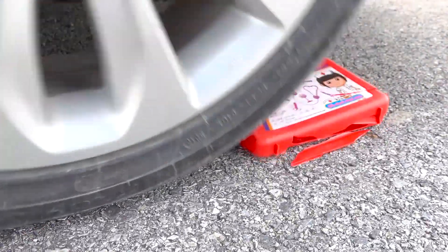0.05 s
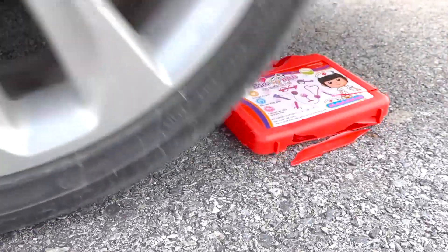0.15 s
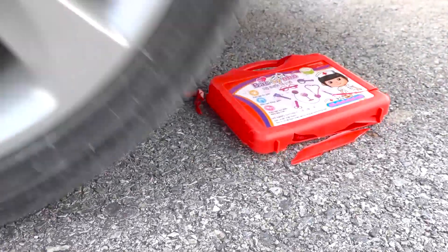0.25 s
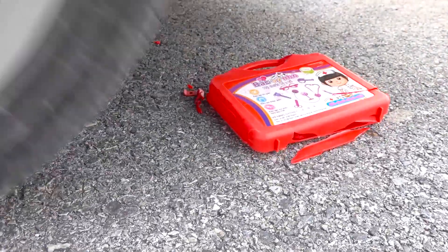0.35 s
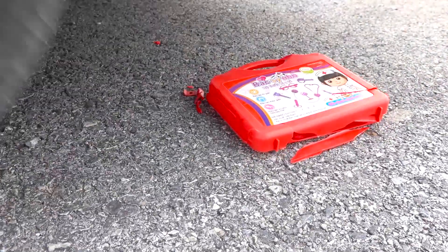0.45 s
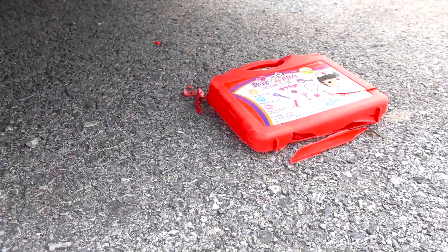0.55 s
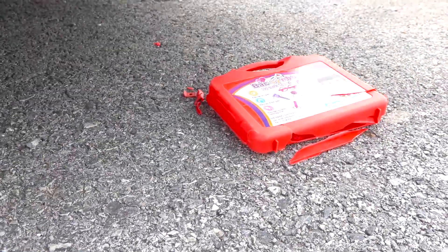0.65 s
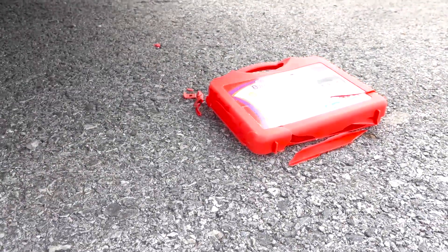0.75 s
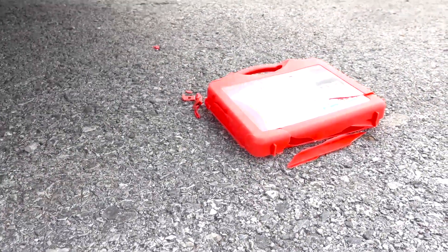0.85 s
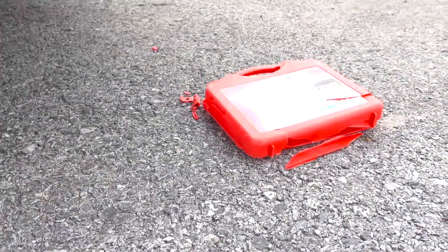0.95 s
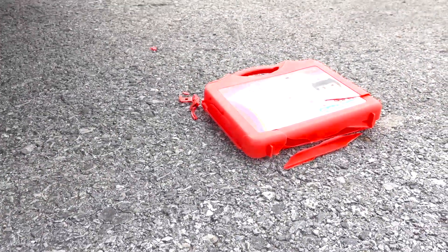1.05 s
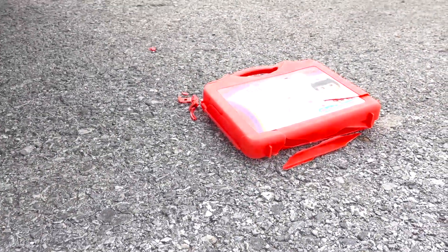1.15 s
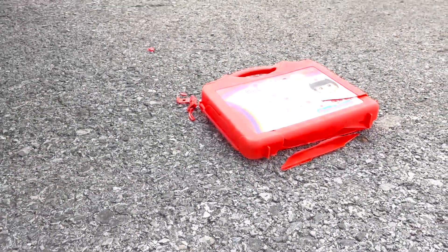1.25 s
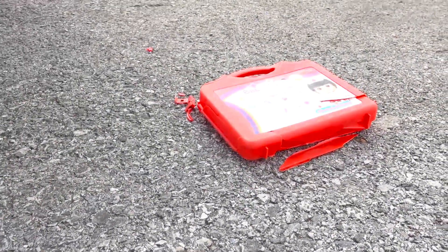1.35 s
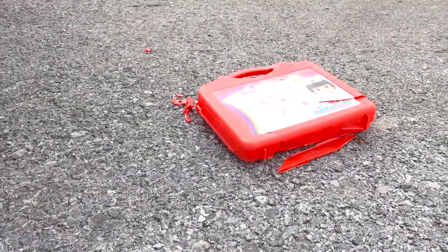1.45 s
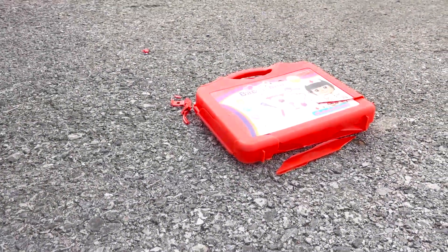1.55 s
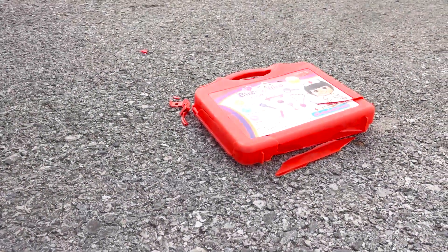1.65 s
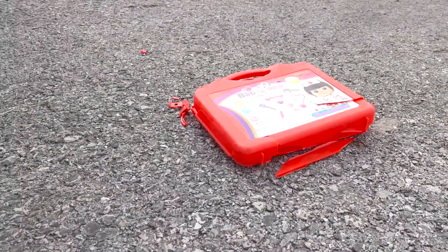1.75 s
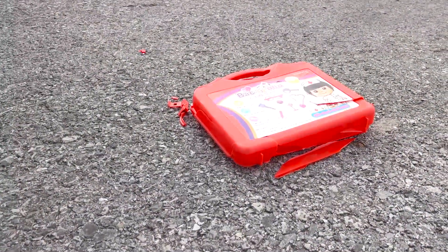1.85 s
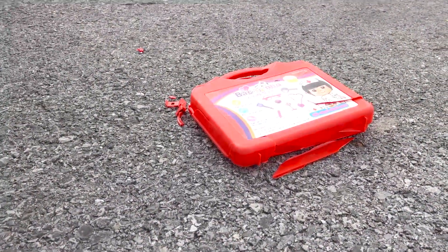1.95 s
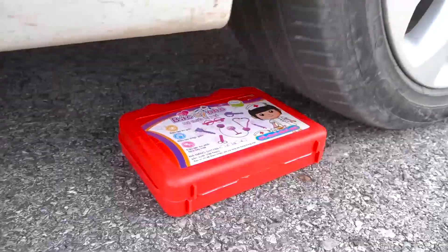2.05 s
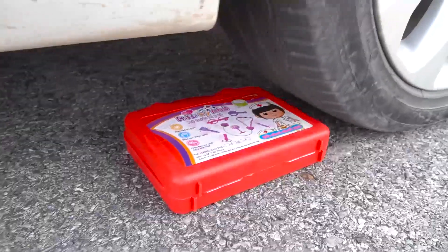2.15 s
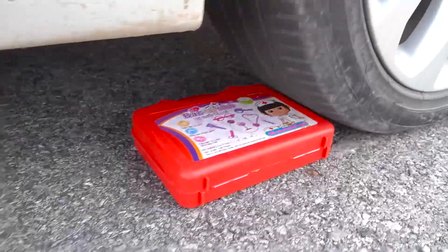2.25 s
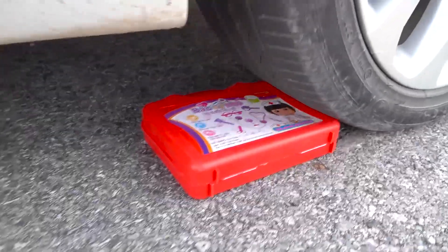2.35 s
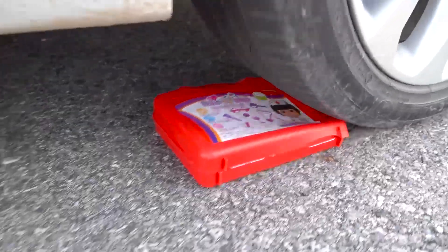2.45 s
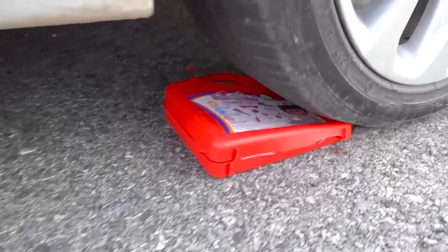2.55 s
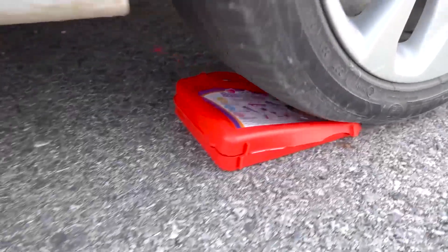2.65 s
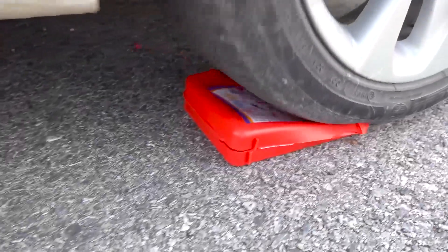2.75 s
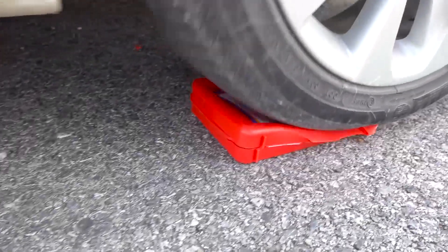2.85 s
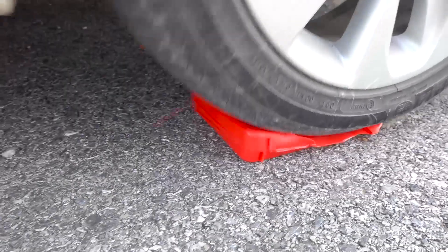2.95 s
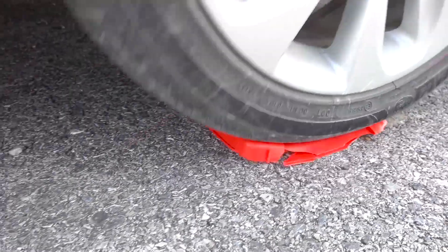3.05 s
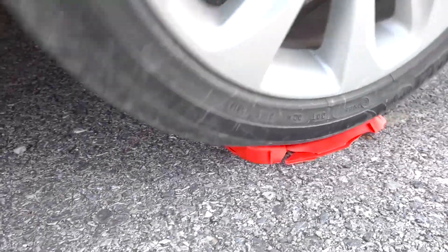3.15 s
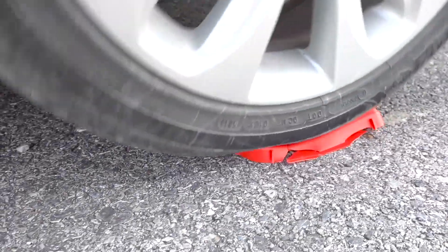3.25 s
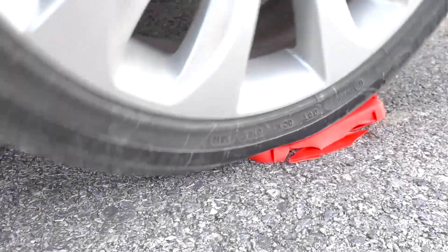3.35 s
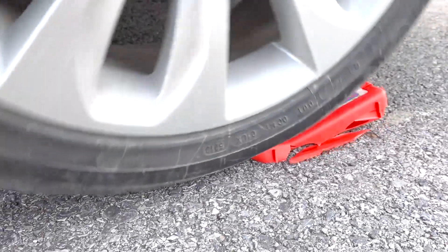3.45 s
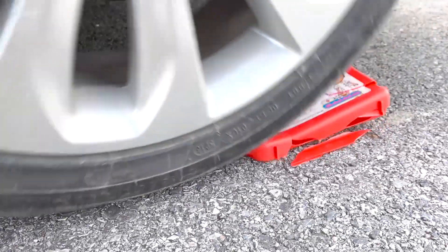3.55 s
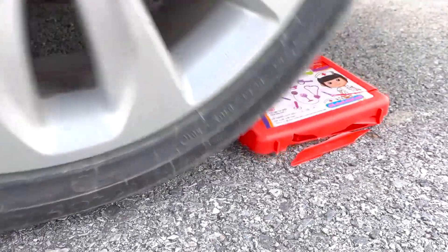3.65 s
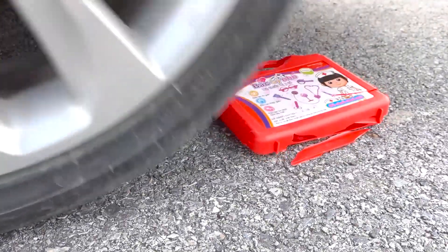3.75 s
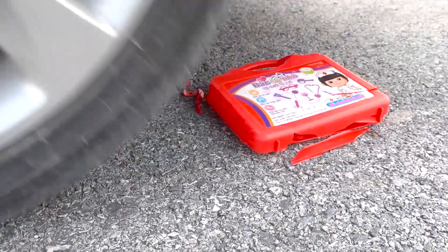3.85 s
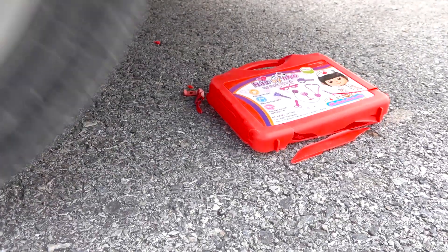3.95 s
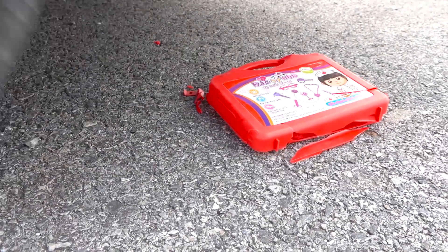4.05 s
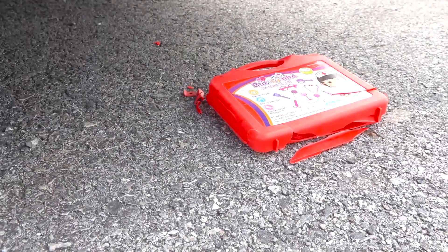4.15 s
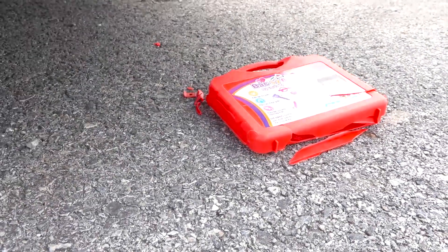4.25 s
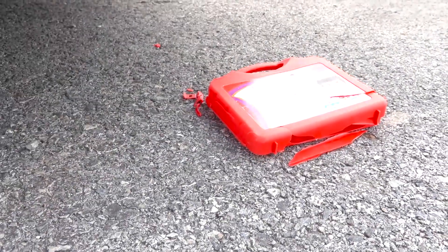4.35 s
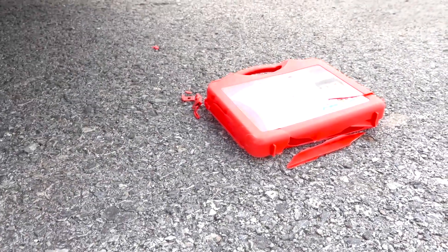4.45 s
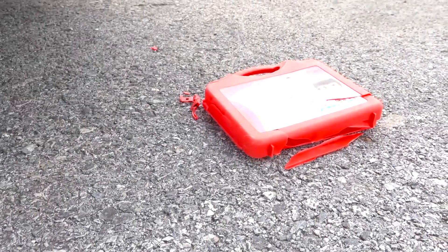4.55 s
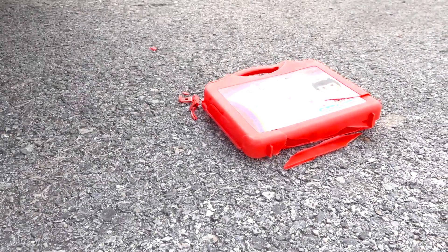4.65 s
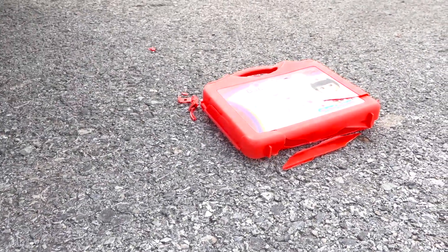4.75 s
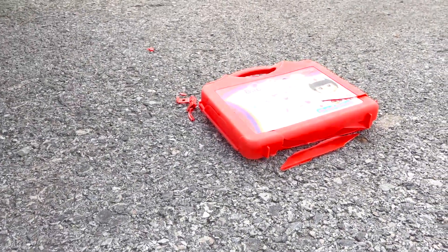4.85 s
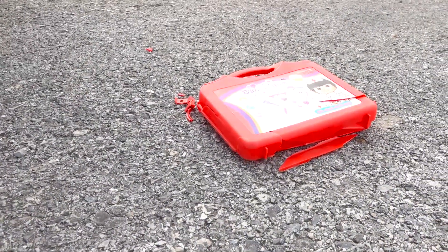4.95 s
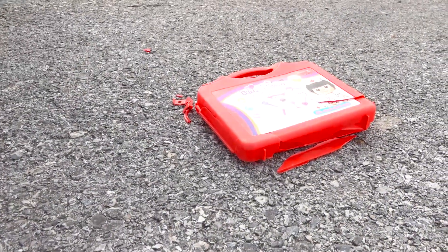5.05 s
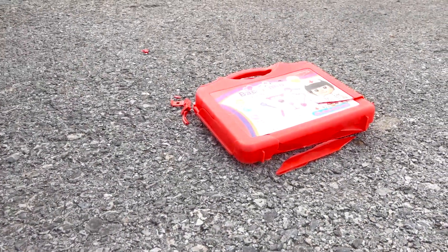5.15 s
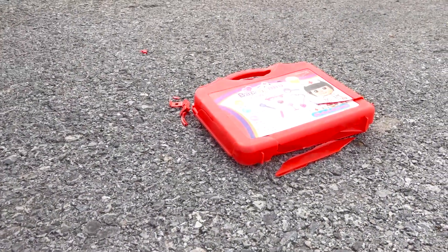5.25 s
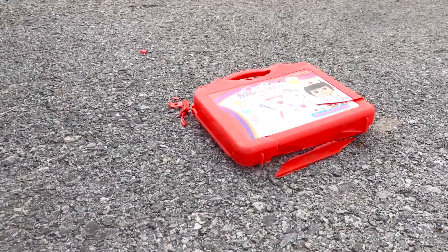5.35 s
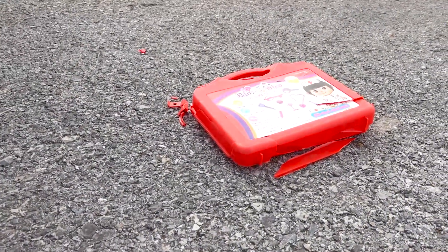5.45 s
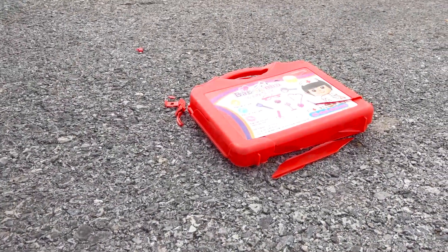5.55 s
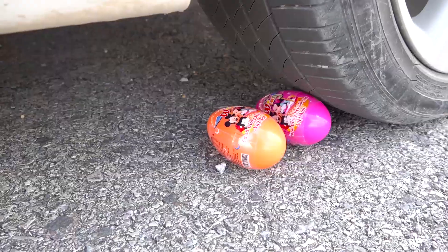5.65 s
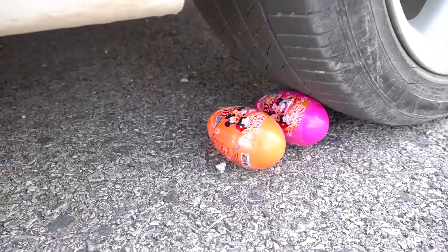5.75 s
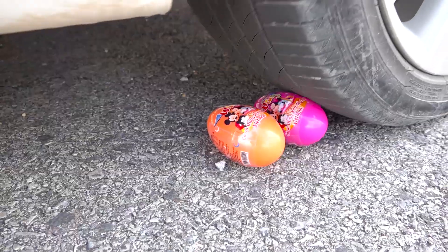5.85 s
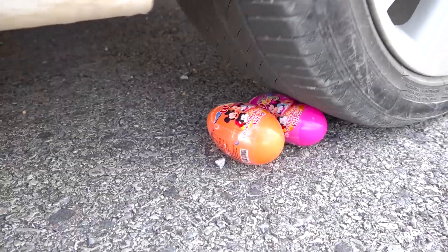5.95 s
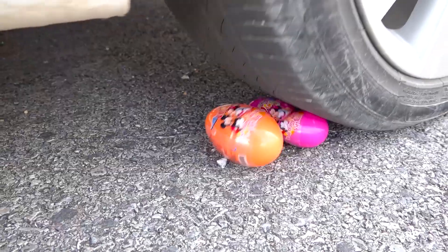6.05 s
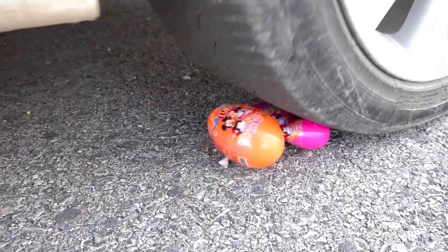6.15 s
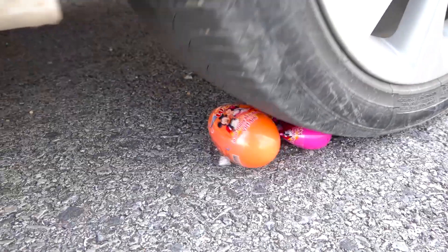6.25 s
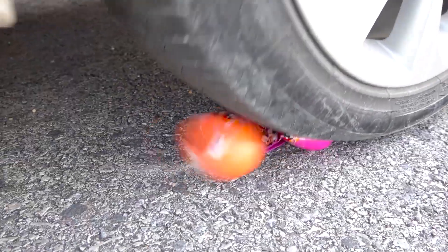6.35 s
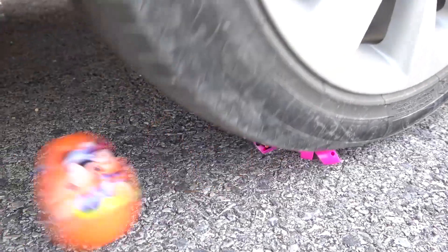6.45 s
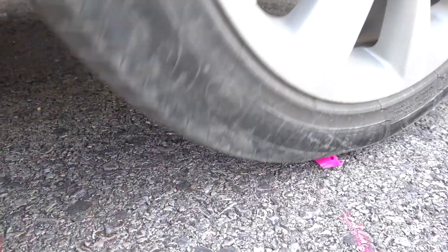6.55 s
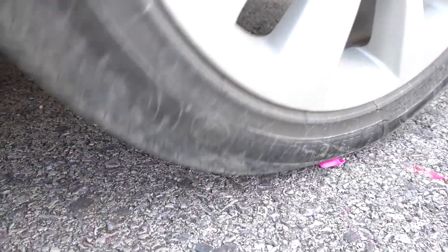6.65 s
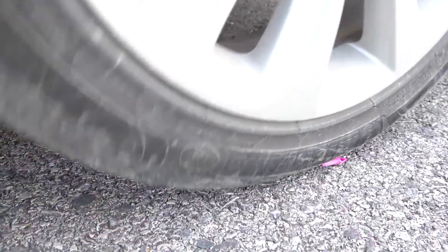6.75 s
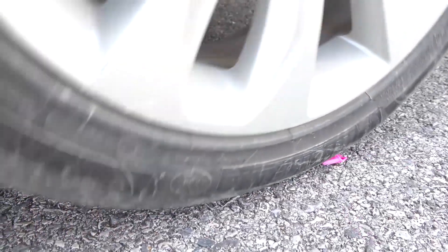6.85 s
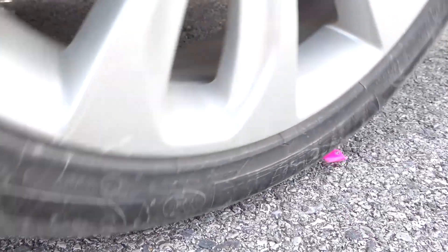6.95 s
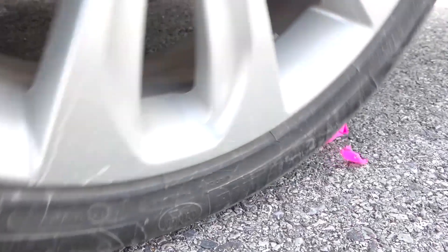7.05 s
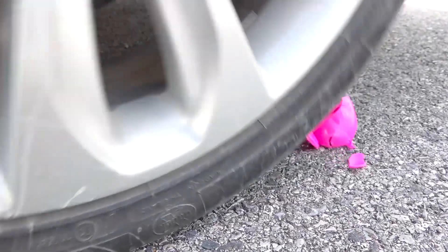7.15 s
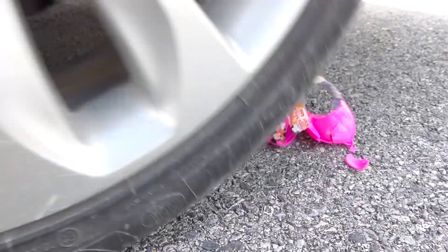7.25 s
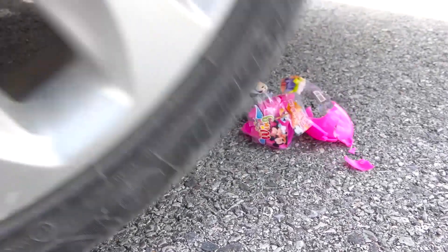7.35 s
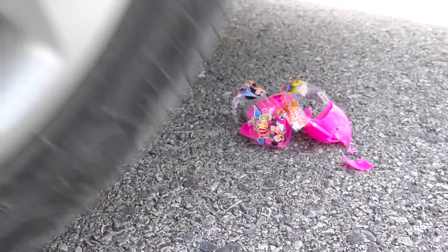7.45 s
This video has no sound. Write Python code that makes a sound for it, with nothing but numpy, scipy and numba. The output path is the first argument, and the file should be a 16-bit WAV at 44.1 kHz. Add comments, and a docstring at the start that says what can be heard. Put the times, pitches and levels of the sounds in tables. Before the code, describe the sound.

A car's tyre slowly crushes a hollow plastic case, then plastic eggs, with sharp cracks and hollow pops over a throbbing, whining engine idle.

```python
"""Plastic cracks under a creeping car: first a toy case on asphalt, then, after a cut, hollow eggs.
Each crack, thump or scrape is a falling chirp and grit, coloured by a ring, with a noise echo under the car.
Hollow pops, two low thumps and the tyre's boom are decaying sines; splinters tick as random grains.
The engine idles: firing harmonics, shaped noise and throbbing whines. A limiter squashes everything.
The scene opens with a preview of the wheel rolling off the case, copied from the end of the first pass."""
import sys
import numpy as np
from scipy import signal
from scipy.fft import rfft, irfft, next_fast_len
from scipy.io import wavfile
from scipy.ndimage import map_coordinates
from numba import njit

SR = 44100
rng = np.random.default_rng(int(sys.argv[2]) if len(sys.argv) > 2 else 0)


def master_out(mix):
    """Clip the mix to full scale and print it as 16-bit PCM to the path in sys.argv[1]."""
    frames = np.transpose(np.atleast_2d(mix))
    ceiling = np.clip(frames, -1, 1)
    pcm = np.round(ceiling * 32767).astype(np.int16)
    wavfile.write(sys.argv[1], SR, pcm)


N = 331191
CUT_S = 5.65  # the case before it, the eggs after


def amp(db):
    """Decibels to gain."""
    return 10 ** (np.asarray(db) / 20)


def unit(x):
    """Scale to rms 1."""
    return x / np.sqrt(np.mean(x ** 2) + 1e-20)


def along(points, hz):
    """Read (Hz, value) points on a log axis."""
    f, v = np.transpose(points)
    return np.interp(np.log(hz + 1), np.log(f + 1), v)


def curves(rows):
    """One value per sample for each column after the time."""
    s, *cols = np.transpose(rows)
    return [np.interp(np.arange(N) / SR, s, c) for c in cols]


def wobble(rate):
    """A smooth random curve with rate knots a second."""
    knots = rng.standard_normal(int(N * rate / SR) + 4)
    return map_coordinates(knots, [np.arange(N) * rate / SR])


def filtered(x, response):
    """Apply a response given as a function of frequency."""
    m = next_fast_len(N + SR // 2)
    return irfft(rfft(x, m) * response(np.fft.rfftfreq(m, 1 / SR)), m)[..., :N]


def causal(gain):
    """The minimum-phase response with this gain: nothing rings before the blow."""
    cep = irfft(np.log(np.maximum(gain, 1e-6)))
    half = len(cep) // 2
    return np.exp(rfft(np.r_[cep[0], 2 * cep[1:half], np.zeros(half)]))


# Stereo width. Each row: frequency in Hz, left-right likeness (1 is mono).
LIKENESS = [(100, 1), (700, 0.98), (2000, 0.95), (5000, 0.96), (9000, 0.71), (13000, 0.9)]


def spread(hz):
    """Mid and side shares at the two microphone ports."""
    turn = np.arccos(np.clip(along(LIKENESS, hz), -1, 1)) / 2
    return np.array([np.cos(turn), np.sin(turn)])


def coloured(pair, spectrum):
    """Two unrelated signals become stereo of rms 1 with this spectrum."""
    mid, side = filtered(pair, lambda hz: amp(along(spectrum, hz)) * spread(hz))
    return unit(np.array([mid + side, mid - side]))


def ringing(modes, t):
    """Decaying sines, one for each (Hz, dB, t60 s) mode."""
    return sum(amp(db - 60 * t / t60) * np.sin(2 * np.pi * hz * t) for hz, db, t60 in modes)


def add(track, s, x):
    """Mix x into the track at time s."""
    i = round(s * SR)
    track[..., i:i + x.shape[-1]] += x[..., :N - i]


def whine(hz, shaft, throb, swing=0.18, wander_hz=4):
    """A whine of the engine's drive that swells and bends with each firing."""
    phase = 2 * np.pi * np.cumsum(hz + wander_hz * wobble(30)) / SR
    swell = np.exp(throb * np.cos(shaft)) / np.sqrt(np.i0(2 * throb))  # equal power at any depth
    tone = np.sin(phase - swing * np.sin(shaft + 1.2))
    return unit(swell * amp(1.2 * wobble(25)) * tone)


# Idle speed in stretches. Each row: start in seconds, firings per second, moment of one firing in seconds.
IDLE_SPEED = [(0, 23.4, 2.425), (3.2, 24.78, 4.236), (5.65, 22.7, 6.11), (6.6, 24.85, 7.197)]
# Exhaust drone harmonics. Each row: multiple of the firing rate, relative level in dB.
FIRING_ORDERS = [(1, -17), (2, -21), (3, -11), (4, -10.5), (5, -10), (6, -4), (7, -1.5), (8, -7.5),
                 (9, -11.5), (13, -11), (15, -11)]
# Upper whine. Each row: first-pass pitch in Hz, relative level in dB, relative throb depth, lag in firings.
UPPER_WHINES = [(2125, -4.5, 0.82, 0.66), (2360, 2, 0.73, 0.0099), (2960, -19, 0.79, 0),
                (3540, -12, 0.72, 0.066), (3620, -5.5, 0.48, 0.17), (6020, -17.5, 1.4, 0.24)]
# Tone of the fan's rush. Each row: frequency in Hz, relative level in dB per Hz.
RUSH_TONE = [(24, -51), (40, -28), (162, -7), (255, -13.5), (365, -12), (455, -15.5), (500, -11),
             (880, -17), (1200, -12), (1300, -18.5), (1700, -20.5), (2210, -31), (3740, -120)]
# Tone of the engine bay's hiss. Each row: frequency in Hz, relative level in dB per Hz.
HISS_TONE = [(820, -16.5), (1400, -8.5), (1980, -9.5), (2400, -4), (2690, -11.5), (3540, -9), (4080, -14.5),
             (4860, -13), (5010, -15), (5890, -15.5), (7760, -26.5), (15100, -39), (16000, -51)]
# How unevenly the engine turns. Each row: time in seconds, share of full throb.
UNEVEN_TURNING = [(2.1, 0.44), (4.3, 0.76), (5.6, 0.46), (7.5, 0.98)]
# Engine bay fader, heard past the wheel. Each row: time in seconds, level in dB.
BAY_LEVEL = [(2.06, -45), (2.25, -43.5), (3.85, -45.5), (5.0, -44), (5.42, -44.5), (5.7, -52.5), (6.1, -51),
             (6.9, -48), (7.5, -46.5)]
# Exhaust fader, louder as the tail comes near. Each row: time in seconds, level in dB.
EXHAUST_LEVEL = [(2.06, -47.5), (3.8, -49.5), (5.25, -45.5), (5.62, -46), (5.68, -54.5), (6.9, -52),
                 (7.5, -47)]
# Belt whine fader, in and out as the car moves. Each row: time in seconds, level in dB before trim.
BELT_LEVEL = [(2.06, -45), (2.5, -39), (3.8, -46.5), (4.02, -45.5), (4.3, -43), (4.6, -54.5), (4.95, -43),
              (5.15, -53), (5.55, -66), (5.68, -46.5), (6.1, -43), (7.5, -43.5)]
# the wheel moves in front of the upper whine and shields it, once in each pass
WHEEL_PASS_S, SHIELD_S, SHIELD_DB = (2.6, 5.8), 0.55, 8.5
# the silencer's note swells once as it goes by
MURMUR_S, MURMUR_WIDTH_S, MURMUR_DB = 5.13, 0.28, -50.5
WHINE_LEFT_DB = 4  # belt and hiss: left over right


def engine(fan_db=0, fan_share=0.35, hiss_db=-2.0, whine_db=-1.0, upper_db=-1.0, whistle_db=-12,
           whistle_follows=0.43, pipe_spread=1.45, pitch_step=.05):
    """Firing orders from the exhaust; belt whine, hiss and the rush of the fan from the engine bay."""
    faders = (BAY_LEVEL, EXHAUST_LEVEL, BELT_LEVEL, UNEVEN_TURNING)
    bay, tail, low, uneven = (curves(rows)[0] for rows in faders)
    t = np.arange(N) / SR
    past_wheel_s = t - np.where(t < CUT_S, *WHEEL_PASS_S)
    upper = bay - SHIELD_DB * (1 + np.tanh(past_wheel_s / SHIELD_S)) / 2

    # one turn of the shaft phase is one firing
    start, rate, firing_s = np.transpose(IDLE_SPEED)
    stretch = np.searchsorted(start, t, "right") - 1
    shaft = 2 * np.pi * rate[stretch] * (t - firing_s[stretch]) + 0.035 * wobble(6)

    # the exhaust pipe delays each order differently, which blends the puffs into a drone
    puffs = np.zeros(N)
    for k, db in FIRING_ORDERS:
        k = round(k)
        level = amp(db + 1.2 * wobble(4))
        puffs += level * np.cos(k * shaft - pipe_spread * k ** 2 + 0.21 * wobble(2.9))
    murmur = amp(MURMUR_DB) * np.exp(-((t - MURMUR_S) / MURMUR_WIDTH_S) ** 2 / 2) * (t < CUT_S)
    exhaust = amp(tail) * unit(puffs) + murmur * whine(500, shaft, throb=0.14, wander_hz=5.14)

    rush_db = fan_share * bay + (1 - fan_share) * tail + fan_db + wobble(11)
    rush = amp(rush_db) * coloured(rng.standard_normal((2, N)), RUSH_TONE)
    air_db = bay + hiss_db + 1.23 * np.cos(shaft) + 0.14 * wobble(9.2)
    air = amp(air_db) * coloured(rng.standard_normal((2, N)), HISS_TONE)

    # the upper partials sit a little higher on the second pass
    pitch = 1 + pitch_step * (t > CUT_S)
    partials = np.zeros(N)
    for hz, db, throb, lag in UPPER_WHINES:
        late = shaft - 2 * np.pi * lag
        tone = whine(hz * pitch, late, 1.3 * throb * uneven, swing=.8, wander_hz=7)
        partials += amp(db + 2.5 * wobble(5)) * tone
    loose = shaft + 0.15 * wobble(10)
    belt = amp(low + whine_db) * whine(1216, loose, throb=1.37 * uneven, swing=0.7, wander_hz=6)
    whistle = whine(4735, shaft, throb=0.87 * uneven, swing=0.92, wander_hz=4.3)
    whistle *= amp(bay + whistle_db + whistle_follows * (low - low.mean()))
    whines = belt + amp(upper + upper_db) * partials + whistle
    balance = amp(np.array([[1], [-1]]) * WHINE_LEFT_DB / 2)
    return exhaust + rush + (air + whines) * balance


# Tread grinding on splinters of the case. Each row: time in seconds, level in dB.
CASE_GRIND_LEVEL = [(2.06, -56), (2.45, -49), (2.86, -54), (3.05, -35), (3.27, -46.5), (3.45, -46),
                    (3.67, -40), (3.74, -52), (4.0, -100)]
# Tread grinding on egg shells. Each row: time in seconds, level in dB.
EGG_GRIND_LEVEL = [(5.7, -76), (5.96, -44.5), (6.3, -49), (6.36, -34), (6.65, -38.5), (6.87, -49.5),
                   (7.13, -39.5), (7.21, -49), (7.5, -43)]
# Tone of splinters on asphalt. Each row: frequency in Hz, relative level in dB per Hz.
GRIT_TONE = [(60, -45), (200, -13), (600, -1), (2200, -0.5), (6500, -7.5), (10000, -15), (12500, -28),
             (16000, -26)]


def grinding(rate=2500, scatter_db=4.0, smear=0.22, chip_rate=35, chip_size=8):
    """Splinters and grit tick under the tread in clumps; about 35 larger chips snap each second."""
    # both rates are average events per second
    ticks = rng.random(N) < rate / SR
    grains = ticks * rng.standard_normal((2, N)) * amp(scatter_db * rng.standard_normal(N))
    chips = chip_size * (rng.random(N) < chip_rate / SR) * rng.uniform(0.79, 1, (2, N))
    t = np.arange(256) / SR
    burst = .5 * amp(-60 * t / 0.0029) * rng.standard_normal((2, 256))
    chips = signal.fftconvolve(chips, burst, axes=1)[:, :N]
    grains = grains + chips + smear * rng.standard_normal((2, N))
    level = curves(CASE_GRIND_LEVEL + EGG_GRIND_LEVEL)[0] + 2.7 * wobble(45)
    return amp(level) * coloured(grains, GRIT_TONE)


# Cracks of plastic, with a few soft thumps and tread scrapes on shards. Each row: start in seconds,
# level in dB before the shared lift, ring in Hz, ring boost in dB, bass tilt in dB, treble tilt in dB.
CRACKS_AND_SCRAPES = [ (2.354, -25.5, 645, 4, 13, -18), (2.361, -29.5, 424, 6, 22, 4),
                      (2.487, -22.5, 965, -2, 3, -13.5), (2.516, -7.5, 2440, 8, 7, 5),
                      (2.5468, -9, 1450, 7, 16.5, 14), (2.559, -12.5, 557, 20, -4, -19),
                      (2.57, -11, 560, 6, 5, -9), (2.636, -14.5, 560, 7.5, 6.5, -6.5),
                      (2.688, -17, 5500, 9, 6.5, -2), (2.693, -18.5, 6500, 6, -12, 15),
                      (2.721, -19.5, 4500, 9, 4, 5.5), (2.77, -26, 634, 17.5, -14.5, -26),
                      (2.789, -26.5, 640, 16, 1, -23), (2.922, -10, 1310, 7.5, -1, 5),
                      (2.929, -10.5, 4540, 11, 0.5, -4), (3.012, -16, 1220, 4.5, -1.5, 5.5),
                      (3.031, -13.5, 900, 14, -2, 4), (3.045, -12.5, 1120, 9.5, 3, 1.5),
                      (3.074, -18, 920, 21, 1, 7), (3.078, -10, 3180, 6.5, -4.5, 0.5),
                      (3.1141, -9, 1610, 5, -4, 2), (3.182, -20, 1720, 1.5, -2.5, -10),
                      (3.223, -32.5, 1930, 6, 16, 18), (3.237, -21.5, 3640, 9.5, -2, -13),
                      (3.296, -32.5, 1180, -1, -15, 2), (3.322, -32.5, 6210, 7, 2, -1),
                      (3.34, -17.5, 2070, 10, 3, -16), (3.347, -6.5, 2120, 4, 7.5, 3.5),
                      (3.371, -13, 4980, 12.5, 6, -1.5), (3.479, -29, 1730, 6.5, -3, -10),
                      (3.56, -31.5, 2910, 8, -16, 4), (3.614, -29.5, 4500, 12, -1, 0.5),
                      (3.633, -32.5, 2080, 7, -14, -21), (3.664, -24.5, 1950, 3.5, -2, -7.5),
                      (3.671, -30, 1460, 20, -15, -10), (3.73, -38, 2190, 3, -13, -3),
                      (3.772, -38, 900, 8, -1, -3), (5.9555, -15, 587, 8.5, 11, 10.5),
                      (6.007, -27.5, 4570, 17, 10, 18), (6.038, -32.5, 650, 21, 8, 12),
                      (6.1264, -18, 970, 11.5, -2.5, 8), (6.15, -27.5, 4350, 18, -5, 20),
                      (6.1707, -21, 820, 13.5, 5.5, 11.5), (6.2459, -19.5, 7260, 0, 2, 22.5),
                      (6.251, -24.5, 4710, 6, 6.5, 4), (6.2706, -22.5, 3040, 16, -15, 10),
                      (6.327, -32.5, 6650, -2, -10, 19), (6.36, -13, 1200, 7.5, -2, 11.5),
                      (6.428, -14, 840, 3.5, 12, 5.5), (6.446, -25, 4270, 11, 13, -1),
                      (6.471, -10, 2010, 5, 3, 5.5), (6.516, -21, 860, 15, -2, -11),
                      (6.581, -17.5, 3850, 10, 12, 8.5), (6.676, -9.5, 1410, 5, 1, -1.5),
                      (6.701, -20.5, 860, 4, 9, 9.5), (6.761, -16.5, 865, 8, -3, -10),
                      (6.7914, -16, 835, 10.5, -0.5, 4.5), (6.852, -37, 800, 2, -1, 7),
                      (7.0196, -36.5, 1190, 3, -18, 8), (7.0503, -16.5, 2600, 5, -18, 0.5),
                      (7.281, -32, 3760, -4, 14, 6), (7.344, -34, 850, 10, 9, 2),
                      (7.438, -35.5, 1220, 13, 17, -1), (7.476, -33, 1230, 8.5, 11, 7)]
# Common tone of the plastic. Each row: frequency in Hz, relative level in dB per Hz.
PLASTIC_TONE = [(59, -49), (100, -33), (197, -11.5), (328, -10), (583, -2), (736, -0.5), (1580, -1),
                (1800, -2), (2220, -2.5), (6560, -10.5), (9610, -18.5), (12100, -29.5), (15000, -30.5),
                (16000, -38)]
# Echo under the car. Each row: frequency in Hz, t60 in seconds.
UNDERSIDE_ECHO = [(200, 0.17), (700, 0.072), (2500, 0.12), (7000, 0.089), (15000, 0.12)]
# echo of a typical crack of each toy in dB, and dB more for each dB of strength:
# small bits of egg shell snap almost dry
TYPICAL_DB = -20
CASE_ECHO_DB, CASE_ECHO_GROWS = 3, 0.14
EGG_ECHO_DB, EGG_ECHO_GROWS = -2, 0.36
# width of a piece's resonance (log frequency): egg shell is more damped
CASE_RING_WIDTH, EGG_RING_WIDTH = 0.16, 0.23


def cracks(snap_t60=0.013, splinter=0.069, bend_s=0.001339, build_s=0.00044, street_db=-26,
           street_t60=0.41, level_db=25, crackle_db=2.5, size=16384):
    """Each crack, thump or scrape excites a ring and scatters under the car; stronger ones echo more."""
    out = np.zeros((2, N))
    t, hz = np.arange(size) / SR, np.fft.rfftfreq(size, 1 / SR)
    plastic, ports = along(PLASTIC_TONE, hz), spread(hz)
    bass, treble = 1 / (1 + (hz / 1050) ** 4), 1 - 1 / (1 + (hz / 4100) ** 4)
    # bending waves in a thin wall are slower at low pitch: the snap is a short falling chirp
    chirp = irfft(np.exp(-4j * np.pi * bend_s * np.sqrt(1000 * hz)))

    # the echo is noise that decays band by band, with a longer, fainter street tail
    noise = rng.standard_normal((len(CRACKS_AND_SCRAPES), 2, size))
    bands, frames, z = signal.stft(noise, SR, nperseg=128)
    decay = amp(-60 * frames / along(UNDERSIDE_ECHO, bands)[:, None])
    decay = decay + amp(street_db - 60 * frames / street_t60)
    lumps = amp(crackle_db * rng.standard_normal((len(CRACKS_AND_SCRAPES), 1, 1, len(frames))))
    echoes = signal.istft(z * decay * lumps, SR)[1][..., :size] * (1 - np.exp(-t / build_s))

    for (s, db, ring_hz, ring_db, bass_db, treble_db), echo in zip(CRACKS_AND_SCRAPES, echoes):
        if s < CUT_S:
            echo_db, grows, ring_width = CASE_ECHO_DB, CASE_ECHO_GROWS, CASE_RING_WIDTH
        else:
            echo_db, grows, ring_width = EGG_ECHO_DB, EGG_ECHO_GROWS, EGG_RING_WIDTH
        echo_db = echo_db + grows * (db - TYPICAL_DB)
        # the crack front keeps splintering for a few milliseconds, above the bass
        grit = signal.lfilter([.9, -.9], [1, -.8], rng.standard_normal((2, size)))
        snap = splinter * grit * amp(-60 * t / snap_t60)
        snap[0] += 0.23 * chirp  # mid only
        blow = snap / np.linalg.norm(snap[0]) + amp(echo_db) * echo / np.linalg.norm(echo[0])
        ring = ring_db / (1 + (np.log((hz + 1) / ring_hz) / ring_width) ** 2)
        colour = unit(amp(plastic + ring + bass_db * bass + treble_db * treble))
        mid, side = irfft(rfft(blow) * causal(colour) * ports)
        add(out, s, amp(db + level_db) * np.array([mid + side, mid - side]))
    return out


# Resonances of the case lid. Each row: frequency in Hz, relative level in dB, t60 in seconds.
LID_MODES = [(590, -4, 0.21), (665, 5.5, 0.71)]


def lid(snaps, ring_db=-72):
    """The flat lid of the case rings on after its cracks, which drive decaying sines."""
    on_case = snaps * (np.arange(N) < CUT_S * SR)
    ring = ringing(LID_MODES, np.arange(SR // 2) / SR)[None]
    return amp(ring_db) * signal.fftconvolve(on_case, ring, axes=1)[:, :N]


# Short decaying notes: hollow pops of buckling plastic and two low thumps. Each row: start in seconds,
# pitch in Hz, level in dB, t60 in seconds.
POPS_AND_THUMPS = [(2.3614, 430, -7, 0.021), (2.488, 855, -1, 0.011), (2.518, 400, -2.5, 0.038),
                   (2.555, 75, -30.5, .25), (2.6365, 586, -7.5, 0.059), (3.075, 85, -30, 0.051),
                   (3.183, 700, -8, 0.023), (3.2371, 1900, 3, 0.0041), (5.9554, 725, -4, 0.016),
                   (6.126, 975, -15, 0.012), (6.1707, 770, -2, 0.013), (6.27, 3080, -10.5, 0.03),
                   (6.4273, 550, -4, 0.016), (6.516, 1110, 0, 0.0067), (6.762, 930, -8, 0.013)]


def pops_and_thumps(rise_s=0.0013):
    """Buckling plastic gives a short hollow note; two low notes thump."""
    out, t = np.zeros(N), np.arange(SR // 3) / SR
    for s, hz, db, t60 in POPS_AND_THUMPS:
        add(out, s, ringing([(hz, db, t60)], t) * (1 - np.exp(-t / rise_s)))
    return out


# The tyre drops onto the road as plastic gives way. Each row: start in seconds, level in dB.
TYRE_DROPS = [(2.553, -23), (2.582, -19.5), (2.602, -20), (3.071, -47), (3.363, -23), (3.383, -10),
              (3.418, -22.5), (6.441, -29), (6.505, -19.5), (6.545, -17)]
# Rubber and air cavity. Each row: frequency in Hz, relative level in dB, t60 in seconds.
TYRE_MODES = [(99, -15.5, 0.086), (213, -14, 0.58), (232.4, 4, 0.079), (276, -13.5, 0.085),
              (436, -20.5, 0.73), (656, -30.5, 0.61)]


def tyre(rise_s=0.0086):
    """Soft drops set the rubber and the air inside it booming."""
    out, t = np.zeros(N), np.arange(SR) / SR
    for s, db in TYRE_DROPS:
        add(out, s, amp(db) * ringing(TYRE_MODES, t) * (1 - np.exp(-t / rise_s)))
    return out


# Phase between the ports. Each row: frequency in Hz, lead of the left port in radians.
LEFT_PORT_LEAD = [(0, 1), (950, -0.63), (3270, -0.5), (8270, 0.77), (11000, -0.81), (12100, -1.6),
                  (13500, -0.0), (16600, 0.0)]
PREVIEW_S, PREVIEW_FROM_S = 2.06, 3.5869  # length, and where it is taken from


def scene():
    """Both passes of the wheel, with the end of the first also heard at the start."""
    snaps = cracks()
    street = snaps + lid(snaps) + pops_and_thumps() + tyre() + grinding() + engine()
    half_turns = np.array([[.5j], [-.5j]])  # half the lead to each side
    street = filtered(street, lambda hz: np.exp(half_turns * along(LEFT_PORT_LEAD, hz)))
    length, start = round(PREVIEW_S * SR), round(PREVIEW_FROM_S * SR)
    return np.hstack([street[:, start:start + length], street[:, length:]])


@njit
def follow(level, attack, release):
    """A level detector that rises fast and falls slowly."""
    out, held = np.empty(len(level)), 0.
    for i in range(len(level)):
        held += (level[i] - held) * (attack if level[i] > held else release)
        out[i] = held
    return out


def record(dry, limit_db=-12, attack_s=0.00084, release_s=0.0076):
    """The limiter lets the first spike through to clip softly, then holds the echo level."""
    held = follow(np.abs(dry).max(0), 1 / (attack_s * SR), 1 / (release_s * SR))
    x = dry * np.minimum(1, amp(limit_db) / (held + 1e-9))
    x = x / (1 + (x / .74) ** 4) ** (1 / 4)
    return filtered(x, lambda hz: 1 / (1 + (hz / 16100) ** 120))  # steep top cut, in Hz


dry = scene()
out = record(dry)
master_out(out)
```